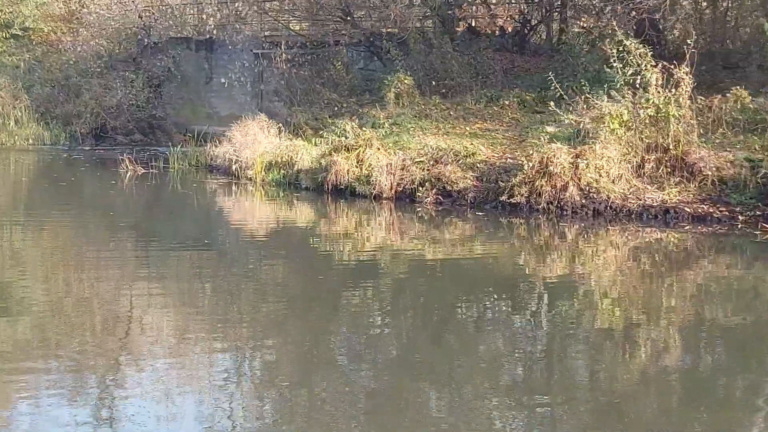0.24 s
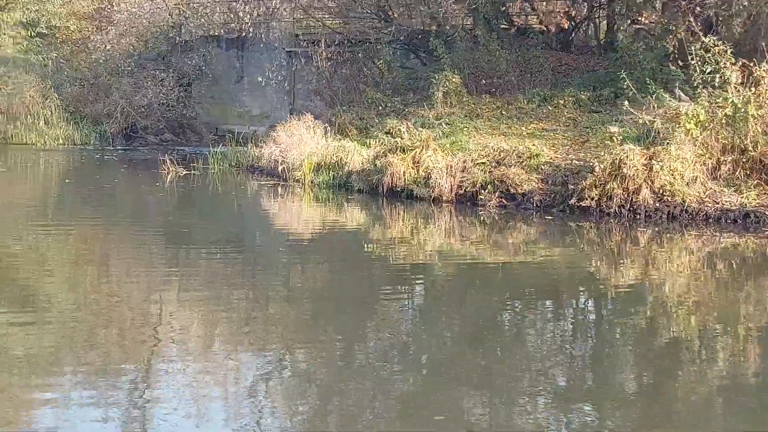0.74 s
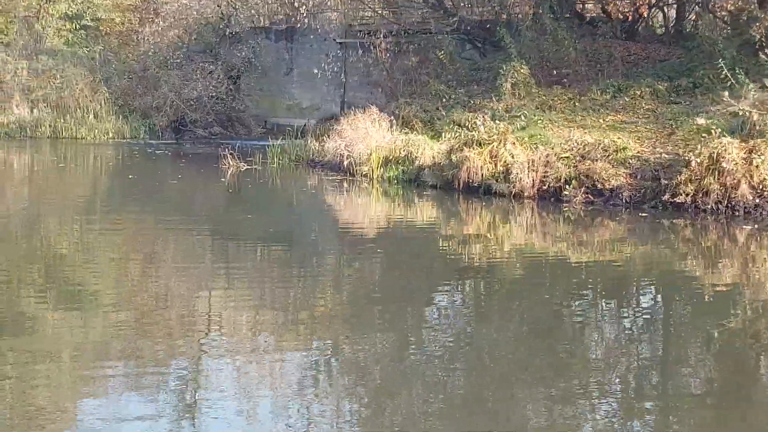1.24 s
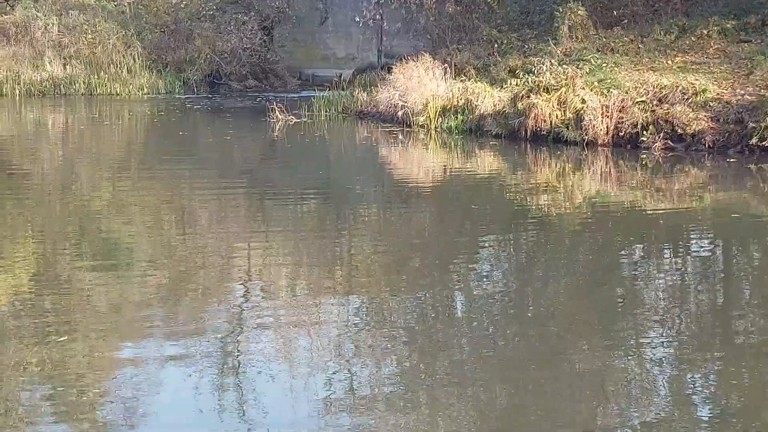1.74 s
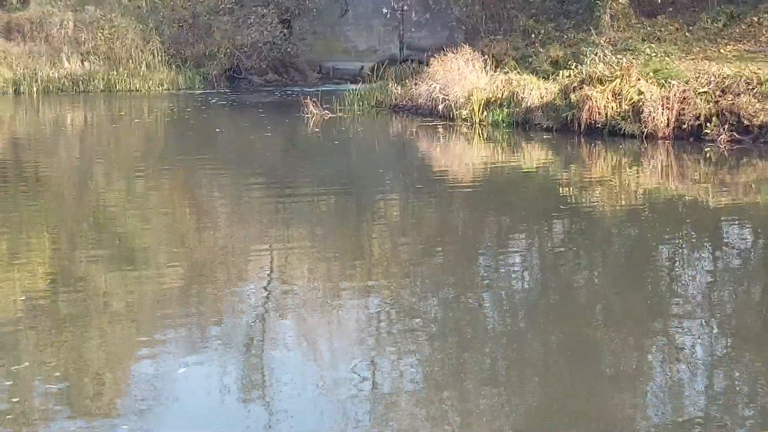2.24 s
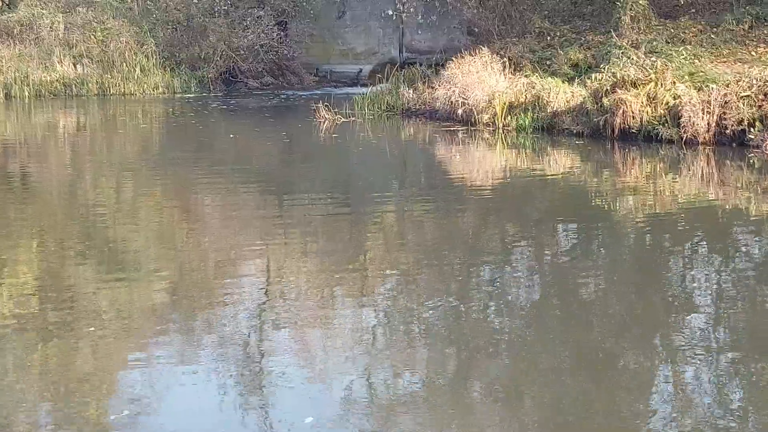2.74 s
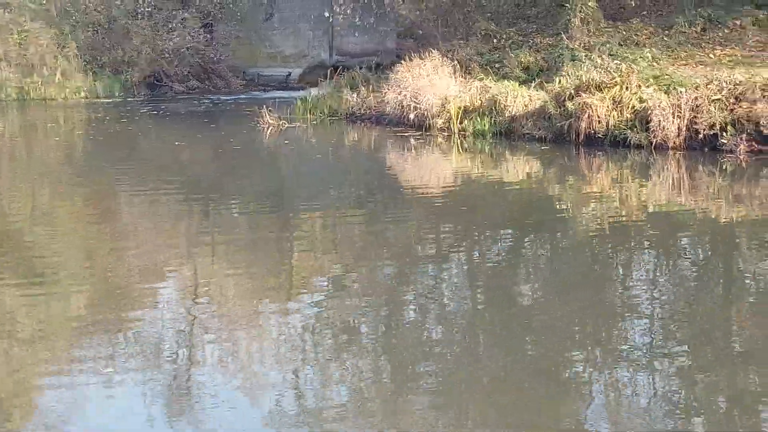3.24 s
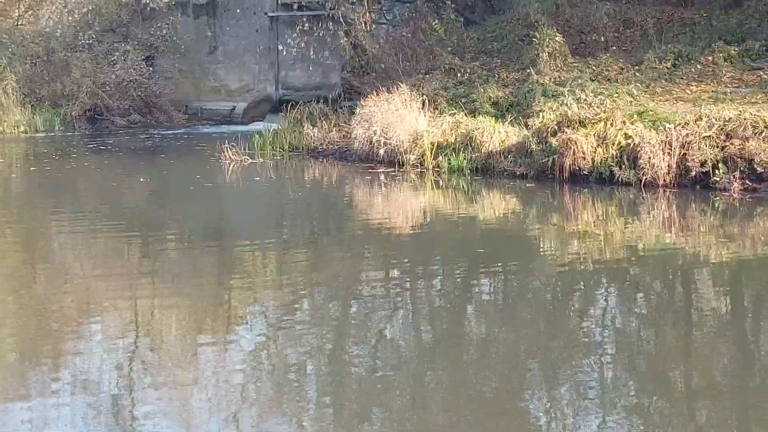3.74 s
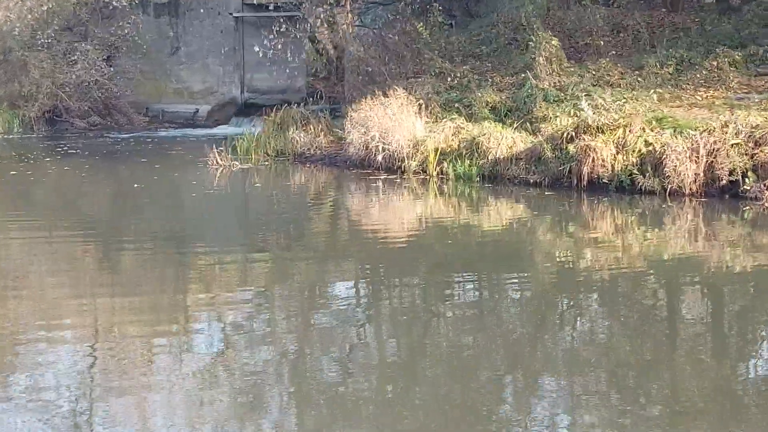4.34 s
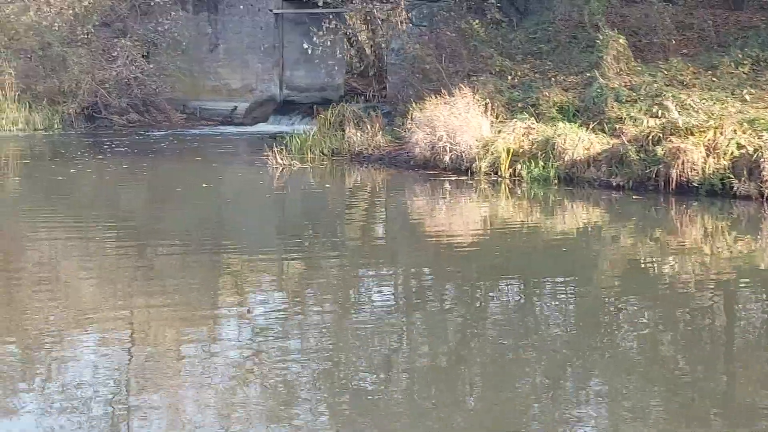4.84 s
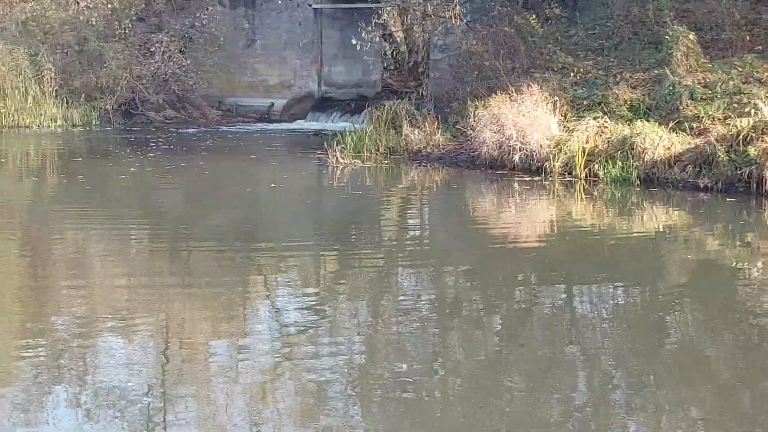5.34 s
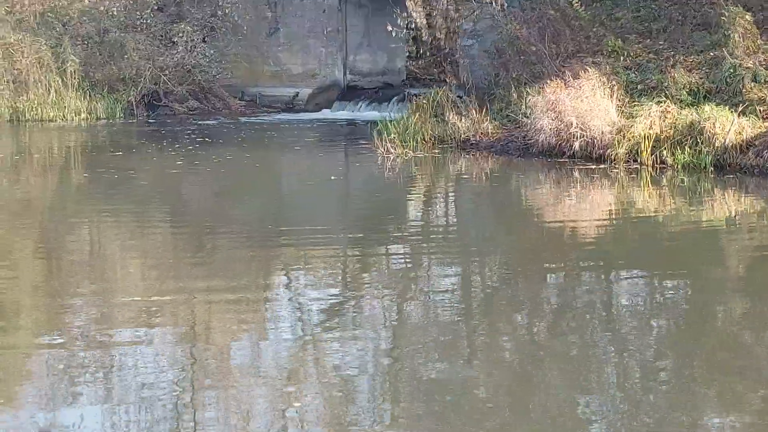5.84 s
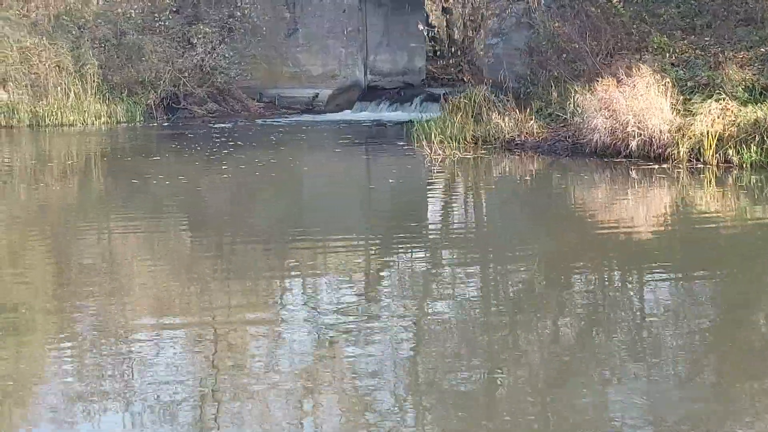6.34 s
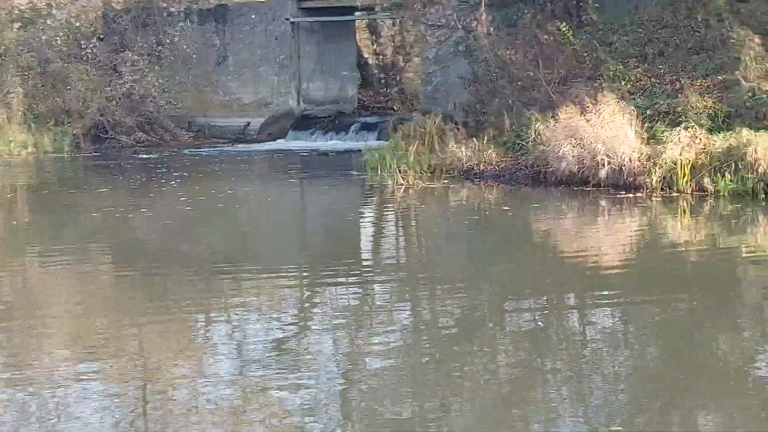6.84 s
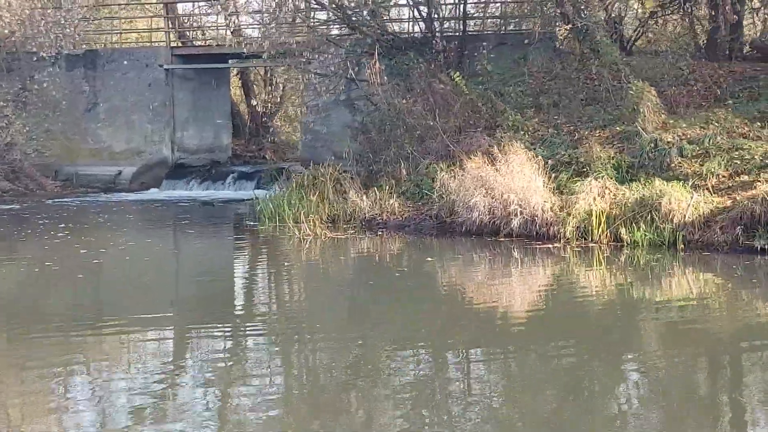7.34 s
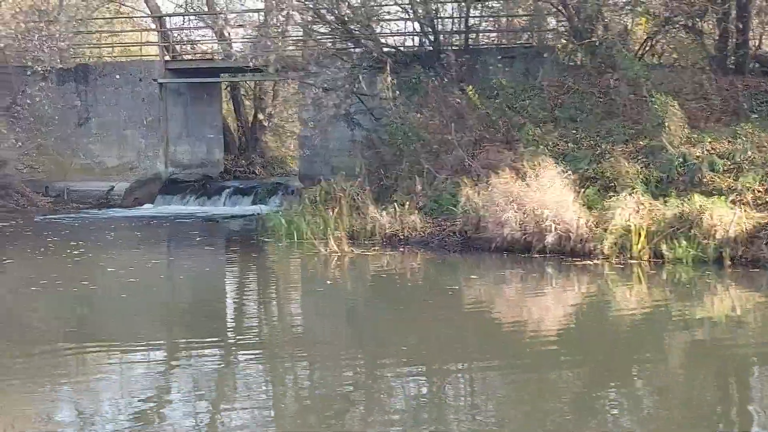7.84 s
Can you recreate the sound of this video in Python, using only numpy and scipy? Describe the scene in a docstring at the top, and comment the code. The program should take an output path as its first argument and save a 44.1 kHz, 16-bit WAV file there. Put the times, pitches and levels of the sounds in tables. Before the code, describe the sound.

A small outboard motor drones steadily on a canal while the boat's wake churns and spatters beside it.

```python
"""First you hear the booming drone of a small outboard motor pushing a boat along a canal.
It is a two-cylinder four-stroke at 2000 rpm, so it fires once per turn of its shaft. Each firing booms
in the hull and knocks the cowling (the motor's lid); the valves tick and the gears whine faintly.
The wake churns and spatters beside the boat, and the hiss of a weir (a low dam) slowly draws nearer."""
import sys
import numpy as np
from scipy import signal
from scipy.fft import rfft, irfft, next_fast_len
from scipy.io import wavfile
from scipy.ndimage import uniform_filter1d, map_coordinates

SR = 44100
rng = np.random.default_rng(int(sys.argv[2]) if len(sys.argv) > 2 else 0)


def to_wav(sig):
    """Store sig (one row per channel, or 1-D mono) as 16-bit WAV at the path in sys.argv[1].

    Samples outside -1..1 are clipped; the rate is SR.
    """
    pcm = np.clip(np.atleast_2d(sig), -1, 1) * 32767
    pcm = np.round(pcm).astype(np.int16)
    wavfile.write(sys.argv[1], SR, pcm.T)  # frames by channels


N = 357210

# how often the motor fires: t/s, f/Hz
FIRING_RATE = [(0, 33.33), (1.7, 33.35), (3, 33.4), (3.8, 33.26), (4.8, 33.42), (5.7, 33.42), (6.8, 33.27),
               (8.1, 33.27)]
# notes that boom in the hull: multiple of the firing rate, level/dB, share of the swell,
# share of the dip, slow wander/dB, phase sway/rad
BOOM_NOTES = [(2, -34, 0.25, -0.41, 1.3, 0.11), (3, -22.5, 0.11, 0.91, 0.48, 0.071),
              (4, -24, 1.02, -0.33, 1, 0.12), (5, -32, -0.48, -0.57, 1.5, 0.19)]
# the boom swells and fades: t/s, level/dB
BOOM_SWELL = [(0, -10), (0.45, 0), (0.9, -4.5), (1.6, 3.5), (2.6, 1), (3.25, 4.5), (3.65, -1.5),
              (4.0, -5.5), (4.35, 1.5), (4.95, 0), (5.3, -6), (5.7, -0.5), (6.1, -3.5), (6.55, 0.9),
              (7.0, 3.5), (7.27, -3.5), (7.57, 5), (8.1, -6.5)]
# the note just above the boom, at six times the firing rate: t/s, level/dB
OVERTONE_LEVEL = [(0, -37.4), (1.4, -34.7), (1.9, -42), (2.9, -39.5), (3.5, -41.8), (5.0, -41.4),
                  (5.6, -34.4), (6.8, -38), (8.1, -42)]
# weaker notes of the motor: multiple of the firing rate, level/dB
HUM_NOTES = [(1, -48), (6.5, -49), (7, -65), (7.5, -63), (8, -50), (8.5, -54), (9, -45), (9.5, -54.5),
             (10, -43), (11, -61), (12, -49.5)]
# tone colour (how strong each pitch is) of the low rumble: f/Hz, level/dB
RUMBLE_COLOUR = [(20, -21), (50, -7.5), (80, 2.5), (115, 7.5), (150, 5.5), (200, -10), (300, -13.5),
                 (600, -51.5)]
# how hard the motor shakes its cowling and mount: t/s, level/dB
SHAKE = [(0, 0.5), (1.5, 0), (2.5, 0), (3.8, 0), (4.7, -4.5), (5.5, 1.5), (6.3, -1), (8.1, -2.5)]
# where the cowling's panels ring: f/Hz, width/Hz, level/dB
COWLING_RINGS = [(245, 85, -2), (324.4, 46, 1), (486, 120, -17)]
# where the valve cover rings: f/Hz, width/Hz, level/dB
COVER_RINGS = [(860, 88, 3.5), (1280, 54, 2), (1684, 90, 3.5), (1892, 78, 0.5), (2174, 140, -2),
               (2890, 270, -6), (3520, 400, -10.5)]
# the gears' whine and its side tones: f/Hz, relative level/dB
GEAR_TONES = [(850, -51.5), (867, -57), (1241, -45), (1289, -47.5), (1305, -49)]
# the wake heaves and settles: t/s, level/dB
WAKE_SURGE = [(0, 0.55), (1.25, 0.0), (1.7, -1.04), (2.95, -0.24), (3.55, -1.7), (3.9, 0.8), (4.27, -1),
              (4.55, 0.8), (5.1, -0.9), (5.45, 0.5), (6.55, 1.1), (6.97, -0.8), (7.3, 0.6), (8.1, -0.5)]
# tone colour of the churning water: f/Hz, level/dB
CHURN_COLOUR = [(120, -12.5), (240, 1.5), (350, -0.5), (480, -1.5), (700, -6), (1000, -7), (1500, -8.5),
                (2200, -13.5), (3300, -18), (4500, -27), (8000, -41)]
# tone colour of the spray: f/Hz, level/dB
SPRAY_COLOUR = [(600, -29), (1800, 0), (3300, 1), (4500, -3.5), (5700, -8), (7000, -8), (8400, -10),
                (9300, -20), (11000, -10), (13000, -11.5), (15500, -18.5)]
# waves that slop against the hull: t/s, peak level/dB
HULL_SLOPS = [(3.115, -33.5), (3.97, -40), (6.33, -39)]
# the sharpest drops: t/s, relative level/dB, bubble f/Hz
SHARP_DROPS = [(0.1544, -38, 3940), (4.573, -33, 4040), (4.8444, -36, 4320), (6.0272, -25, 4220),
               (7.4194, -36, 4130)]
# tone colour of the drops: f/Hz, level/dB
DROP_COLOUR = [(1500, -25), (4000, 2), (7500, 0), (9500, -8), (15000, -9)]
# tone colour of the weir's rush: f/Hz, level/dB
WEIR_COLOUR = [(2500, -23), (4400, -6), (5500, 2.5), (6400, -3), (8500, -14), (10000, -25)]
# how alike left and right sound: f/Hz, likeness (1 = the same)
EAR_LIKENESS = [(30, 0.3), (100, 0.76), (260, 0.92), (450, 1), (870, 0.64), (1200, 0.38), (1900, 0.28),
                (3500, 0.34), (8000, 0.054)]
# how much louder left is than right: f/Hz, level/dB
LEFT_LEVEL = [(100, .4), (250, 1.2), (400, .3), (800, -.2), (1800, -4.8), (2600, -2.7), (3500, -4.2),
              (5000, .7), (6600, 3.3), (7500, 0), (8400, -8.5), (9600, 3), (14000, -.5)]
# how much later left is than right: f/Hz, t/s
LEFT_DELAY = [(100, .0003), (500, .00022), (1700, .0003), (3000, .00019), (4500, .00015), (7000, .00019)]

DIP_AT_S, DIP_WIDTH_S, DIP_DB = 4.25, 0.13, -3.5  # one of the boom's main notes sinks once, briefly
CHURN_DB, GURGLE_DB, SPRAY_DB, WEIR_DB = -32, -43.5, -47, -58  # base levels of the water sounds
CHURN_FOLLOWS, SPRAY_FOLLOWS = 1.26, 0.92  # dB gained per dB of surge
SPUTTER_DB, SPLASH_DB, FIRING_SPRAY = 0.83, 0.73, .3  # spray: fast flicker, slower flicker, firing burst
WEIR_DB_PER_S = 0.61  # the hiss grows as the weir draws nearer
CLEARS_BANK_S, CLEARING_S, BANK_SHADOW_DB = 1.5, 0.13, -4  # the bank hides the weir at first
TOP_HZ = 15750  # the highest pitch heard


def exhaust(shaft, flutter_db=1.25, hum_wander_db=2.5, hum_sway=0.26):
    """The firings make a stack of notes; the ringing hull delays them into a booming thud."""
    def note(multiple, db, sway):
        hz = multiple * shaft[-1] * SR / N
        hull_phase = np.angle(resonances([(105, 15, 0)], hz))  # the hull rings at 105 Hz
        drift = sway * wobble(2.547)  # echoes from the banks shift each note slowly
        return amp(db) * np.sqrt(2) * np.sin(2 * np.pi * multiple * (shaft + .434) + hull_phase + drift)
    swell_db = over_time(BOOM_SWELL)
    dip_db = DIP_DB * np.exp(-((np.arange(N) / SR - DIP_AT_S) / DIP_WIDTH_S) ** 2)
    boom = 0
    for multiple, db, swell_share, dip_share, wander_db, sway in BOOM_NOTES:
        level_db = db + swell_share * swell_db + dip_share * dip_db
        waver_db = wander_db * wobble(4) + flutter_db * wobble(26)
        boom += note(multiple, level_db + waver_db, sway)
    overtone = note(6, over_time(OVERTONE_LEVEL) + flutter_db * wobble(18), hum_sway)
    hum = sum(note(multiple, db + hum_wander_db * wobble(3.025), hum_sway) for multiple, db in HUM_NOTES)
    rumble = stereo(rng.standard_normal((2, N)), colour(RUMBLE_COLOUR))
    return boom + overtone + amp(over_time(SHAKE)) * hum + amp(-32) * rumble


def cowling(shaft):
    """Each firing knocks the panels. The two cylinders take turns, one harder than the other."""
    hard = bursts(shaft / 2, offset=.51, decay=0.065, scatter_db=2.5)
    soft = 0.73 * bursts(shaft / 2, offset=0.0089, decay=0.08, scatter_db=3.0)
    knocks = (hard + soft) * rng.standard_normal((2, N))
    return amp(over_time(SHAKE) - 38.0) * stereo(knocks, lambda hz: resonances(COWLING_RINGS, hz))


def valves(shaft):
    """The parts that push the valves tick on their cover, once strongly and once weakly each turn."""
    strong = bursts(shaft, offset=.2, decay=0.42, scatter_db=-0.5)
    weak = 0.3 * bursts(shaft, offset=.85, decay=0.24, scatter_db=4.5)
    ticks = (strong + weak) * rng.standard_normal((2, N))
    return amp(-41.5) * stereo(ticks, lambda hz: resonances(COVER_RINGS, hz))


def gears(shaft):
    """The gears sing thin, wavering tones whose pitch follows the shaft's speed."""
    shaft_time = shaft / shaft[-1] * N / SR
    return sum(amp(db - 3 + 5.0 * wobble(5)) * np.sin(2 * np.pi * hz * shaft_time + .5 * wobble(12))
               for hz, db in GEAR_TONES)


def wake(surge_db):
    """The wake churns and gurgles with bubbles; a wave on the hull adds a short, louder gurgle."""
    big_bubbles = bubbles(count=3500, centre_hz=879, octaves=0.907, cycles=4.6, samples=1200)
    gurgle = stereo(big_bubbles, np.ones_like)
    churn = stereo(patchy_noise(patchy_db=1.11), colour(CHURN_COLOUR))
    t = np.arange(N) / SR
    slops = sum(amp(db) * np.exp(-((t - at_s) / 0.017) ** 2) for at_s, db in HULL_SLOPS)
    surge = amp(CHURN_FOLLOWS * surge_db)
    return surge * (amp(CHURN_DB) * churn + amp(GURGLE_DB) * gurgle) + slops * gurgle


def spray(shaft, surge_db):
    """Spray hisses and fizzes with tiny bubbles, louder as the wake surges and the weir nears."""
    fizz = bubbles(count=16000, centre_hz=6910, octaves=0.81, cycles=2.6, samples=96)
    prickle = bubbles(count=1500, centre_hz=12500, octaves=.12, cycles=16, samples=300, scatter_db=2.8)
    flicker = amp(SPUTTER_DB * wobble(34) + SPLASH_DB * wobble(14))
    # the exhaust leaves with the cooling water, so the spray sputters with the firings
    sputter = 1 + FIRING_SPRAY * bursts(shaft, offset=.87, decay=.12, scatter_db=4.5)
    hiss = patchy_noise(patchy_db=1.7) + 0.5 * fizz + 0.21 * prickle
    level_db = SPRAY_DB + WEIR_DB_PER_S * np.arange(N) / SR + SPRAY_FOLLOWS * surge_db
    return amp(level_db) * stereo(flicker * sputter * hiss, colour(SPRAY_COLOUR))


def drops():
    """Single drops snap on the surface and each rings a tiny bubble."""
    sound = np.zeros((2, N + SR))
    t = np.arange(SR // 20) / SR
    for at_s, db, bubble_hz in SHARP_DROPS:
        snap = rng.standard_normal((2, len(t))) + np.sin(2 * np.pi * bubble_hz * t)
        start = round(at_s * SR)
        sound[:, start:start + len(t)] += amp(db - 1 - 60 * t / .012) * snap  # fades 60 dB in 12 ms
    return filtered(sound[:, :N], colour(DROP_COLOUR))


def weir():
    """The weir's rush comes out from behind the bank and grows as the boat nears it."""
    t = np.arange(N) / SR
    hidden = .5 - .5 * np.tanh((t - CLEARS_BANK_S) / CLEARING_S)
    spatter = bubbles(count=5000, centre_hz=5500, octaves=0.39, cycles=2.5, samples=96)
    rush = stereo(patchy_noise(patchy_db=2.2) + .7 * spatter, colour(WEIR_COLOUR))
    return amp(WEIR_DB + WEIR_DB_PER_S * t + BANK_SHADOW_DB * hidden) * rush


def bubbles(count, centre_hz, octaves, cycles, samples, scatter_db=3.0):
    """Bubbles ring at random times and places, each a short tone that rises as it fades."""
    when, place, rank = rng.random((count, 3)).T[:, :, None]
    hz = np.clip(centre_hz * 2 ** (octaves * rng.standard_normal((count, 1))), centre_hz / 4, TOP_HZ)
    swings = hz * np.arange(samples) / SR
    age = swings / cycles
    strength = amp(-scatter_db * np.log(np.maximum(rank, .004)))  # many quiet, a few loud
    tone = strength * np.exp(-age) * np.sin(2 * np.pi * swings * (1 + 0.055 * age))
    index = ((when * N).astype(int) + np.arange(samples)).ravel()
    ears = np.cos(2 * np.pi * place), np.sin(2 * np.pi * place)
    return unit(np.array([np.bincount(index, (tone * ear).ravel(), N)[:N] for ear in ears]))


def bursts(turns, offset, decay, scatter_db):
    """A loudness curve that jumps once a turn and dies away; offset and decay are in turns."""
    turn, age = np.divmod(turns + offset, 1)
    sizes = amp(scatter_db * rng.standard_normal(2048))
    return sizes[turn.astype(int)] * np.exp(-age / decay)


def patchy_noise(patchy_db):
    """Two noises with louder and softer patches scattered over time and pitch."""
    spectra = signal.stft(rng.standard_normal((2, N)), nperseg=512)[2]
    patches = uniform_filter1d(rng.standard_normal(spectra.shape[1:]), size=7, axis=0)
    patches = uniform_filter1d(patches, size=9, axis=1)
    return unit(signal.istft(spectra * amp(patchy_db * unit(patches)), nperseg=512)[1][:, :N])


def wobble(rate):
    """A smooth curve through `rate` random points a second."""
    points = rng.standard_normal(1024)
    coarse = np.arange(0, N + 64, 64)
    return np.interp(np.arange(N), coarse, map_coordinates(points, [coarse * rate / SR], mode="wrap"))


def resonances(rings, hz):
    """How strongly, and how late, a ringing part answers a shake at each frequency."""
    return sum((-1) ** k * amp(db) * 1j * hz * width / (centre ** 2 - hz ** 2 + 1j * hz * width)
               for k, (centre, width, db) in enumerate(rings))


def stereo(pair, response):
    """Filter two unrelated signals and mix them to left and right, most alike in the low notes."""
    def mix(hz):
        angle = np.arccos(np.clip(over_pitch(EAR_LIKENESS, hz), -1, 1)) / 2
        return response(hz) * np.array([np.cos(angle), np.sin(angle)])
    mid, side = filtered(pair, mix)
    return unit(np.array([mid + side, mid - side]))


def filtered(x, response):
    """Scale and delay each frequency in x as response(hz) says."""
    size = next_fast_len(N + SR // 4, real=True)
    return irfft(rfft(x, size) * response(np.fft.rfftfreq(size, 1 / SR)), size)[..., :N]


def colour(table):
    """Turn a tone colour table into a filter response."""
    return lambda hz: amp(over_pitch(table, hz))


def over_pitch(table, hz):
    """Read between a table's frequencies on a log scale."""
    table_hz, values = np.transpose(table)
    return np.interp(np.log(hz + 1), np.log(table_hz + 1), values)


def over_time(table):
    """Read between a table's times, one value per sample."""
    return np.interp(np.arange(N) / SR, *np.transpose(table))


def amp(db):
    """Turn decibels into a gain."""
    return 10 ** (np.asarray(db) / 20)


def unit(x):
    """Scale to an average power of 1."""
    return x / np.sqrt(np.mean(x ** 2) + 1e-20)


def scene():
    """The turning shaft times the motor's sounds, and the water plays around them."""
    shaft = np.cumsum(over_time(FIRING_RATE)) / SR  # turns so far
    surge_db = over_time(WAKE_SURGE)
    motor = exhaust(shaft) + cowling(shaft) + valves(shaft) + gears(shaft)
    return motor + wake(surge_db) + spray(shaft, surge_db) + weir() + drops()


def record(dry):
    """The motor is to the right, so the left side hears it later and duller; the very top is cut."""
    side = np.array([[.5], [-.5]])  # left, right
    def response(hz):
        gain = amp(side * over_pitch(LEFT_LEVEL, hz))
        delay = np.exp(-2j * np.pi * hz * side * over_pitch(LEFT_DELAY, hz))
        return gain * delay * (hz < TOP_HZ)
    return filtered(dry, response)


dry = scene()
out = record(dry)
to_wav(out)
```